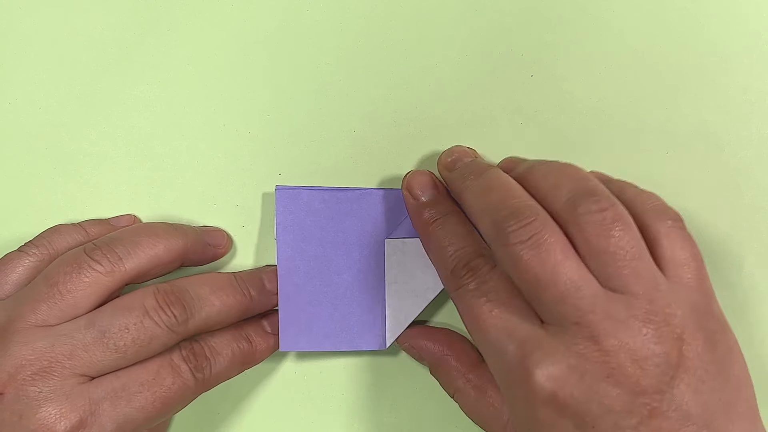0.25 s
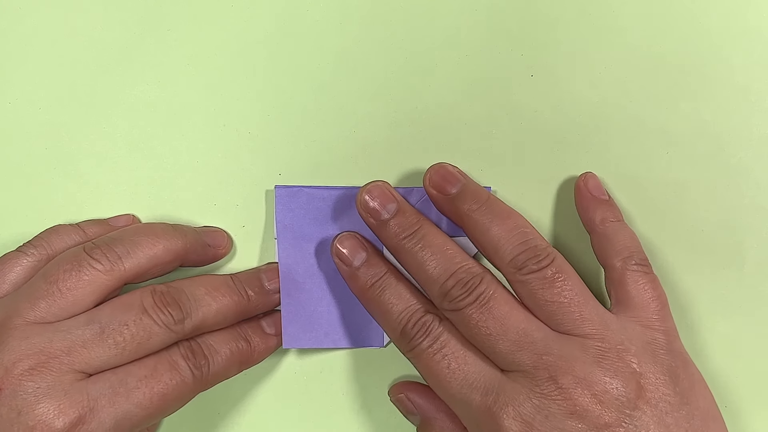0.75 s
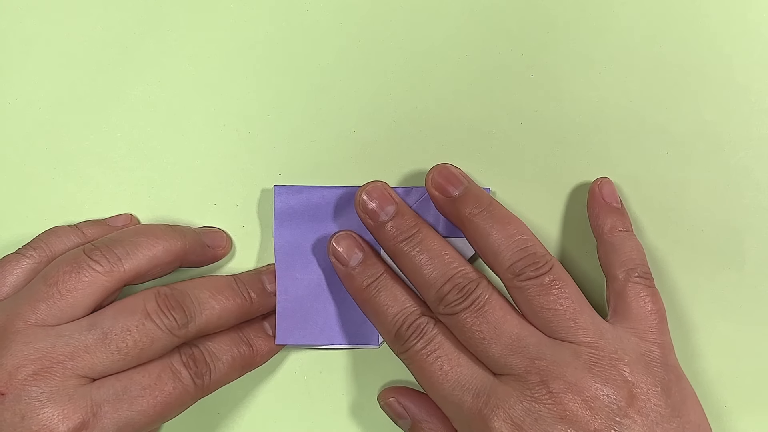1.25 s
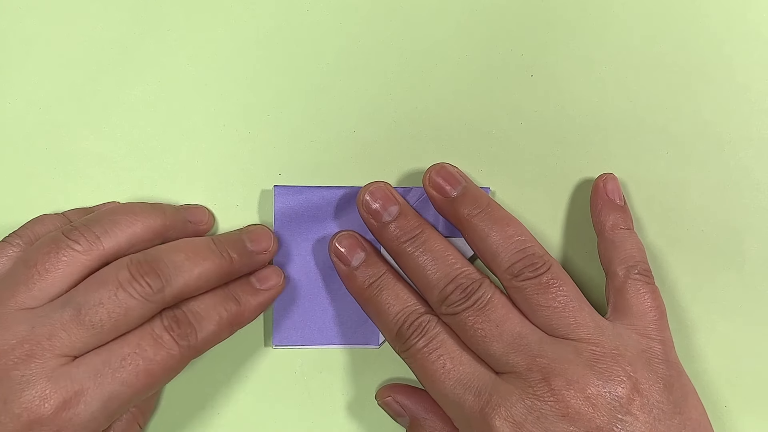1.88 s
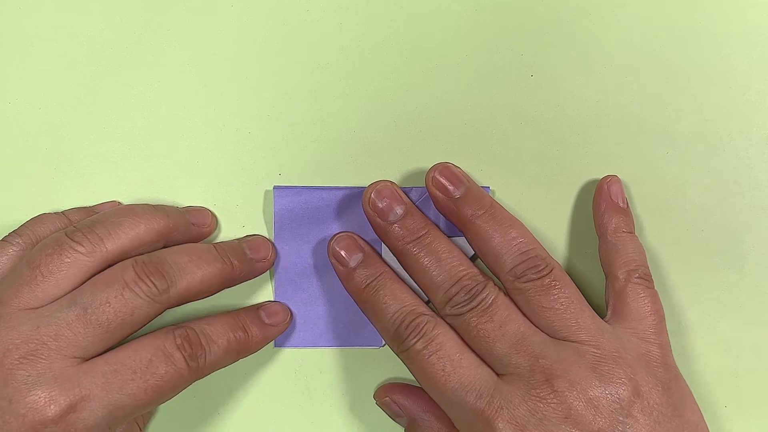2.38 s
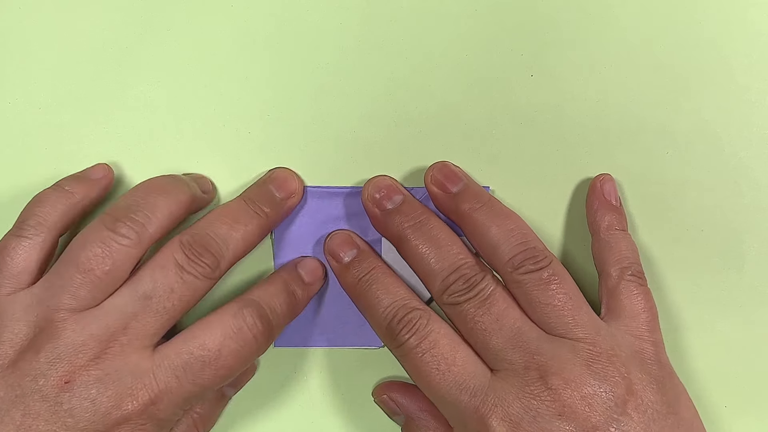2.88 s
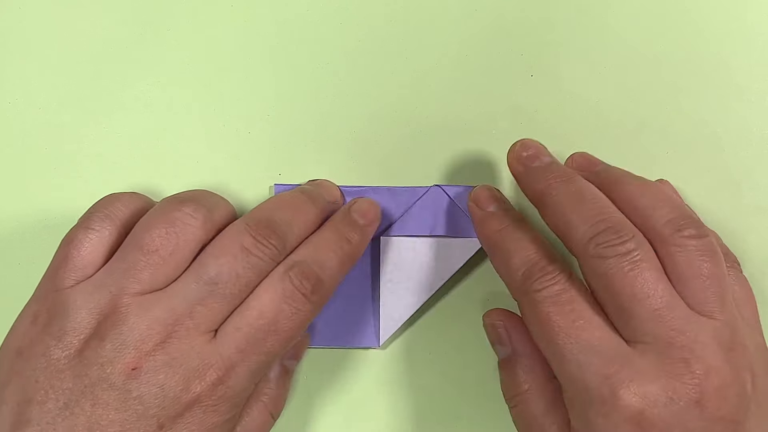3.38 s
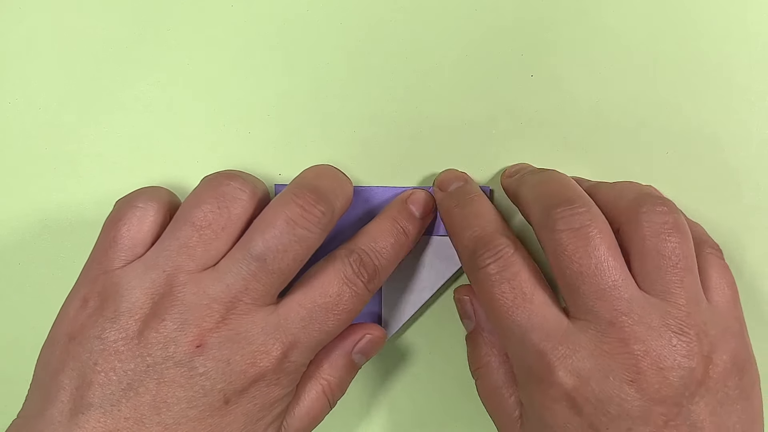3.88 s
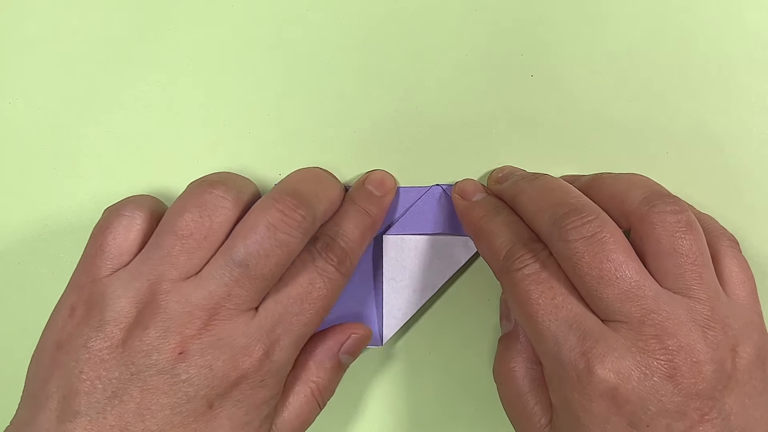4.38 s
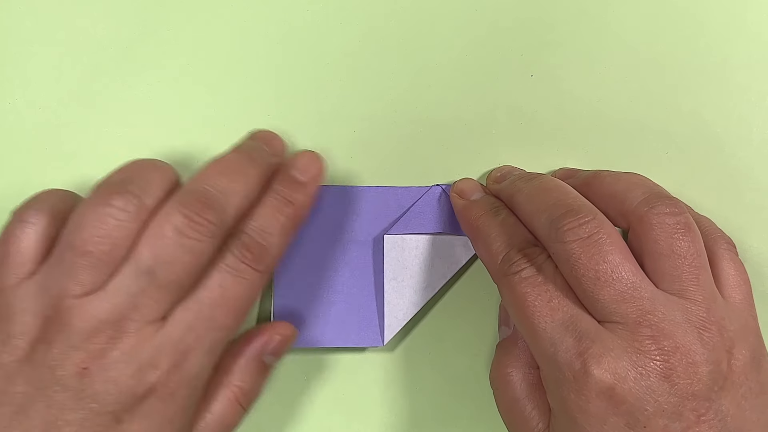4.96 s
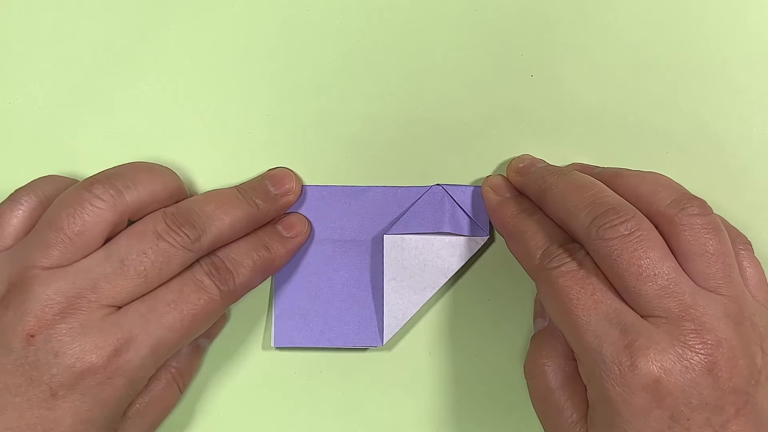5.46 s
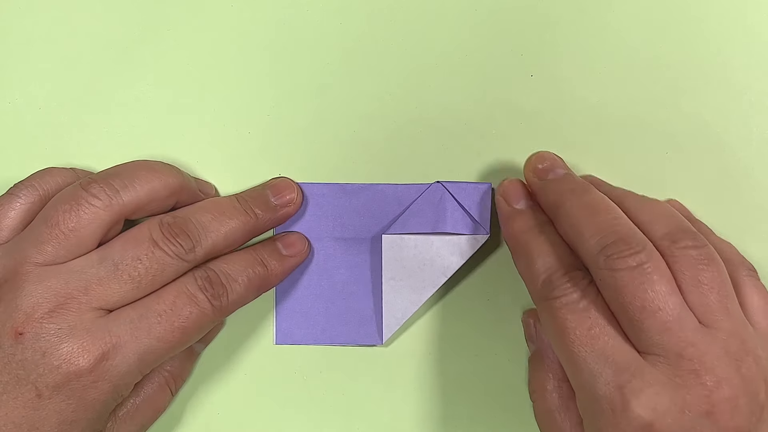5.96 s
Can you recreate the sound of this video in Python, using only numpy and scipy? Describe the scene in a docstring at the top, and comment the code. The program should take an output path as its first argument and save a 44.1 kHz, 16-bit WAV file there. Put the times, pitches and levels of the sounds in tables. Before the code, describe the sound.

A close microphone catches hands folding a small piece of paper on a table in a quiet room with a very short reverberation. From 0 to 0.9 seconds, fingers brush the sheet in short, grainy, hissy strokes, with small ticks near 0.4 and 0.7. Two bright, dry snaps follow at about 1.15, then only faint rubs and a click near 1.6. It is almost still around 2 to 2.4. Rubbing returns at 2.45, and a cluster of crisp crease snaps with a soft thud comes at 3.0 to 3.2. Light fingertip knocks begin around 3.4, growing firmer at 3.9 and 4.4 amid quick, fizzy strokes and a sharp snap at 4.3. A pair of the strongest dull taps lands near 5.2, with a low thud, then airy rustling continues to about 6.2. A faint, low appliance hum, weakest near 2.4, and soft air noise run underneath.

```python
"""At a table in a quiet room, hands fold a small sheet of paper close to one microphone.
Skin slides over the sheet as grainy, shaped noise; creases and flaps snap as short, ringing noise bursts.
Fingertips knock as dull bursts through the table's resonances, and presses thud as a fading low sine.
An appliance hums faintly behind it as slowly drifting sines, over soft air noise."""
import sys
import numpy as np
from scipy import signal
from scipy.fft import rfft, irfft
from scipy.io import wavfile
from scipy.ndimage import uniform_filter1d

SR = 44100
rng = np.random.default_rng(int(sys.argv[2]) if len(sys.argv) > 2 else 0)


def store_pcm(level_fs):
    """Save levels as 16-bit WAV."""
    pcm = np.round(np.clip(level_fs, -1, 1) * 32767).astype(np.int16)
    wavfile.write(sys.argv[1], SR, np.atleast_2d(pcm).T)


N = 274302

# Finger strokes over the paper. Each row: start in seconds, length in seconds, share of the length at which
# it is fastest, relative hiss level in dB, low body in dB, added fizz in dB, fizz centre in Hz.
FINGER_STROKES = [(-.01, 0.11, 0.55, -59.5, 5, 1.5, 11000), (0.134, 0.19, 0.21, -57, 1.5, -2.5, 12000),
                  (.27, .11, 0.17, -57, -2.5, 2.5, 8500), (0.369, 0.31, 0.25, -53, -2.5, 0, 12500),
                  (0.612, 0.19, 0.38, -59.5, -8, -5.5, 11000), (.85, .16, .2, -63.5, -11, -2, 11000),
                  (1.283, 0.1, .3, -67, -12, -5, 11000), (1.504, 0.18, 0.74, -60.5, 1, 4.5, 10000),
                  (1.693, .19, 0.66, -66, -6, -12, 11000), (2.453, 0.18, 0.39, -59, 0.5, -1.5, 11000),
                  (2.561, .15, 0.37, -56, -2, 4.5, 12500), (2.675, 0.13, 0.42, -60, -4.5, 4, 11500),
                  (2.904, 0.06, .45, -61, -2, 3, 10000), (3.018, 0.095, 0.62, -60.5, 2, 5, 9500),
                  (3.108, 0.38, 0.58, -62.5, 2, 2.5, 9500), (3.488, 0.42, 0.15, -63, 1.5, -1.5, 11000),
                  (3.69, 0.092, 0.48, -59.5, -1.5, 2.5, 9000), (3.767, 0.093, .55, -59, 0, 1, 8500),
                  (3.873, 0.21, 0.57, -60, 1, 7, 10900), (3.92, 0.073, 0.84, -55, 6, 8, 10800),
                  (4.12, 0.16, 0.59, -63.5, 4, 3, 9000), (4.276, 0.098, 0.38, -51.5, 1, 1, 12000),
                  (4.423, 0.22, 0.54, -57.5, 4, 6.5, 10900), (4.572, .14, 0.9, -60, 8, 8.5, 12100),
                  (4.707, .105, 0.68, -64, 1, 9, 13300), (4.945, 0.059, 0.92, -61, -3, 3.5, 9500),
                  (5.033, 0.16, 0.4, -60, 5.5, 7, 10800), (5.215, 0.054, 0.57, -56, 1.5, 9, 9400),
                  (5.259, 0.3, 0.26, -58, -9, 1, 10500), (5.385, 0.22, 0.37, -61.5, -0.5, -3.5, 10800),
                  (5.589, 0.15, .45, -65.5, 7, 3, 11000), (5.678, 0.28, 0.62, -63, 5, -11, 10700),
                  (5.847, 0.2, 0.71, -56, -2, 2.5, 13700), (6.03, 0.33, 0.8, -70, 9, 1, 11000)]
# Colour of skin sliding on paper. Each row: pitch in Hz, level in dB.
RUB_COLOUR = [(100, 8), (350, 9), (900, 8), (2100, 7), (2800, 6.5), (4200, 9), (5300, 3), (7400, 7.5),
              (8600, 7.5), (10200, 7.5), (11700, 3), (12800, -0.5), (14200, -4.5), (16000, -18)]
# How much of the low body each pitch takes. Each row: pitch in Hz, share from 0 to 1.
BODY_SHARE = [(2200, 1), (3500, 0)]
# Paper snaps. Each row: time in seconds, relative level in dB, body in dB, brightness in dB, flap pitch in Hz,
# flap ring in dB, time for the burst to fall by 60 dB in seconds, lead-in scrape in dB.
PAPER_SNAPS = [(0.049, -20.5, 3, 4, 3940, 8, 0.015, 6), (0.0753, -17, 7, -12, 2230, 12, .028, -24),
               (0.2977, -22, 8, 7.5, 3110, 17, 0.011, -30), (0.3858, -1, -10, -37, 2070, 17.5, 0.007, -28),
               (.4, -13.5, 6, -20, 2150, 10, 0.035, -12), (.6722, -8, -9, -16.5, 3220, 7, 0.008, -26),
               (0.6869, -19.5, 4.5, -20, 1115, 18, 0.019, -30), (1.128, 3, -7, -2, 5800, 10.5, 0.0078, -39),
               (1.1632, 8.5, -12.5, -6, 6100, 16.5, 0.013, -32),
               (1.1678, 1, -11.5, -21, 2550, 7, 0.011, -31), (1.6285, -9.5, -6, -6.5, 6500, 10.5, 0.02, -1),
               (2.9693, -3.5, -2.5, -19, 2820, -3, 0.0043, -48),
               (3.0312, -13.5, 2.5, -5, 2150, 16, 0.021, -28), (3.1321, 3, 0, -4.5, 3300, 11.5, 0.011, -14),
               (3.1666, -13.5, -12, 4, 2930, 10, 0.009, -18),
               (3.17, 8.5, -13.5, -8, 2020, 14.5, 0.0072, -38), (3.1867, 0, 2, -4, 3500, 15.5, 0.0057, -16),
               (3.2083, 2, -21, -22, 2290, 11, 0.0026, -32), (3.8327, -18.5, 9, -22, 2200, 14, 0.0074, -36),
               (4.0514, -23.5, 6, -18, 2170, 12, 0.0091, -30), (4.205, -13, -2.5, -13, 2270, 5, 0.022, -26),
               (4.2412, -11.5, 2, -26, 1630, 6, .016, -34), (4.3135, 4, -1, -8, 3280, 10.5, 0.0052, -21),
               (4.6907, -13, 4.5, 1.5, 1520, 16, 0.024, -1), (4.9945, -16, 7.5, -3, 1270, 3, 0.036, -2),
               (5.004, -14, -8, -14, 2920, 11, 0.0054, -30), (5.0244, -5.5, -2, -12, 2160, 8.5, .012, -36),
               (5.348, -6, -3.5, -10, 3060, 11, 0.0051, -29),
               (5.375, -17.5, -2, -21, 1495, 26.5, 0.0088, -30), (5.6365, -21, 2, -9, 1100, 4, 0.011, -37),
               (6.0729, -25, 8.5, -11, 1230, 2, 0.027, -32)]
# Resonances of the folded sheet. Each row: pitch in Hz, width in Hz, boost in dB.
SHEET_MODES = [(2144, 180, 5.5), (2835, 210, 6.5), (3260, 330, 3), (4360, 130, 8), (6740, 710, 3.7),
               (10100, 860, 2)]
# Soft presses that make the whole table thud. Each row: time in seconds, level in dB.
TABLE_THUDS = [(0.053, -50), (3.042, -37), (3.977, -48), (4.413, -50), (4.996, -46), (5.198, -41.5)]
# Fingertips landing. Each row: time in seconds, relative level in dB, then three parts in dB on top of it:
# the pad's low weight, the knock, the nail's tick.
FINGER_TAPS = [(.1406, -22, 13, 14.5, 0), (0.2976, -10, -8, -2, -19), (.412, -19, 12, 10, -13),
               (.673, -12.5, -14, -6, 0), (3.042, -19, 15, 18, 1), (3.426, -21.5, -5, 12, -9),
               (3.5744, -20.5, -1, 8, -19), (3.6461, -8.5, -12, 13.5, -21), (3.871, -16, 10.5, 9, -3),
               (3.9321, -0.5, -3.5, 4, -8), (3.9645, -5.5, -3, 5, -18), (3.985, -13.5, 7, 3, -9),
               (4.412, -11.5, 10, 1, -7), (4.4335, -0.5, -4, 10, -7.5), (5.082, -10, 8.5, 9, -20),
               (5.1578, 2, 0, 6, -11.5), (5.1948, 6, 0, 2.5, -12.5), (5.22, -22, 1, 2, -9),
               (5.263, -11, 20, 8, -8), (5.2991, -16, 5, 4, -10), (5.619, -18.5, -23, 21, -15)]
# Resonances of the table top. Each row: pitch in Hz, width in Hz, boost in dB.
TABLE_MODES = [(186.4, 30, 10.5), (305, 11, 6), (390.5, 27, 6.5), (462, 37, 5), (672, 30, 7.5),
               (725, 82, 6), (940, 97, 15.5), (1210, 55, 6), (1355, 123, 8.5)]
# Loudness of the motor hum over time. Each row: time in seconds, rms level in dB.
HUM_LEVEL = [(0, -62), (.7, -63), (1.4, -63.5), (2, -66.5), (2.4, -74.5), (3, -67.5), (3.6, -70),
             (4.1, -61), (4.8, -62.5), (5.5, -60), (6.22, -61)]
# Steady tones of the appliance. Each row: pitch in Hz, rms level in dB.
APPLIANCE_TONES = [(100, -103), (317.6, -76.5), (444, -71.5), (500.6, -79.5), (527, -76.5), (888.2, -81.5),
                   (1332, -80)]
# Colour of room air and microphone hiss. Each row: pitch in Hz, level in dB.
AIR_COLOUR = [(25, -47), (45, -59.5), (80, -41), (130, -46.5), (250, -50), (340, -48), (600, -52),
              (1000, -53.5), (1550, -60.5), (2050, -53.5), (2700, -62.5), (5500, -64.5), (10000, -69),
              (15000, -69)]
# Reverberation. Each row: pitch in Hz, time to fall by 60 dB in seconds.
ROOM_T60 = [(150, 0.44), (600, 0.17), (2000, 0.16), (6000, 0.17), (14000, 0.13)]
# How strongly the room returns each pitch. Each row: pitch in Hz, level in dB.
ROOM_COLOUR_DB = [(200, 0.5), (1000, 1.5), (2300, -4.5), (4200, -1.5), (6200, 1), (8500, 0), (15000, 7.5)]

BUFFER = 4096  # samples in one burst or filter
BINS = np.fft.rfftfreq(BUFFER, 1 / SR)
CLOCK = np.arange(N) / SR
HUM_HZ = 91.4  # average pitch
TOUCH_S, LIFT_S = 0.0078, 0.016  # skin meets and leaves the sheet
SLOW_START_DB, SLOW_END_DB = -6.5, -10.5  # a stroke is weaker at its ends than at its fastest
ARCH = 0.99  # shape of that fall
RESTING_DB = -73.5  # relative hiss of fingers that only hold the sheet
FIZZ_OCTAVES = 0.65  # half width of the fizz band
FIZZ_WITH_SPEED = 0.49  # the fizz swells and fades this much more steeply than the rest
THUD_HZ, THUD_T60 = 94.4, 0.24  # the table's lowest mode and its ring time in seconds
NAIL_FALL_DB = -10  # the nail's tick falls from 2000 to 5500 Hz
EDGE_HZ = 15850  # top of the recorder's band


def gain_of(db):
    """Turns decibels into amplitude."""
    return 10 ** (np.asarray(db) / 20)


def evened(x):
    """Scales to an rms of one."""
    return x / np.sqrt(np.mean(x ** 2) + 1e-20)


def read(points, hz):
    """Joins (Hz, value) points by straight lines on a log-frequency axis."""
    f, value = np.transpose(points)
    return np.interp(np.log(hz + 1), np.log(f + 1), value)


def add(mix, s, sound):
    """Lays a sound into the mix at time s."""
    part = mix[max(round(s * SR), 0):][:len(sound)]
    part += sound[:len(part)]


def wander(rate_hz):
    """Smooth random drift of unit rms, with little movement faster than the given rate."""
    hz = np.fft.rfftfreq(N, 1 / SR)
    return evened(irfft(rfft(rng.standard_normal(N)) * np.exp(-(hz / rate_hz) ** 2), N))


def peak(hz, width_hz, db):
    """A resonance as a bump in dB on a flat response."""
    return 10 * np.log10(1 + (gain_of(db) ** 2 - 1) / (1 + (2 * (BINS - hz) / width_hz) ** 2))


def coloured(x, db):
    """Filters with the given response so that sound only follows its cause: sharp start, ringing end."""
    log_gain = np.log(gain_of(np.r_[db, db[-2:0:-1]]))  # mirrored to cover negative frequencies
    response = np.exp(np.conj(signal.hilbert(log_gain)))
    return signal.fftconvolve(x, np.fft.ifft(response).real)


def blow(t60, click, lead_db, lead_s):
    """A spectrally even jolt in mid-buffer: a swelling scrape, the release, then dying flutter."""
    middle = BUFFER // 2
    t = (np.arange(BUFFER) - middle) / SR
    scrape = gain_of(lead_db) * np.exp(-abs(t) / lead_s)
    flutter = np.exp(-np.log(1000) * abs(t) / t60)
    jolt = np.where(t < 0, scrape, flutter) * rng.standard_normal(BUFFER)
    jolt /= np.linalg.norm(jolt)
    jolt[middle] += click
    # undo the burst's own broad colour
    power = uniform_filter1d(abs(rfft(jolt)) ** 2, size=60)
    return coloured(jolt, -10 * np.log10(power))


def background():
    """A motor hum and steady tones drift slightly in phase, over still room air."""
    drift = 0.033 * wander(rate_hz=10.0)  # in cycles
    hum_gain = gain_of(np.interp(CLOCK, *np.transpose(HUM_LEVEL)))
    hum = hum_gain * np.sin(2 * np.pi * (HUM_HZ * CLOCK + drift))
    tones = np.zeros(N)
    for hz, db in APPLIANCE_TONES:
        cycles = hz * CLOCK + 0.15 * wander(rate_hz=1.8)
        tones += gain_of(db) * np.sin(2 * np.pi * cycles)
    air_gain = gain_of(read(AIR_COLOUR, np.fft.rfftfreq(N, 1 / SR)))
    air = irfft(rfft(rng.standard_normal(N)) * air_gain, N)
    return np.sqrt(2) * (hum + tones) + air  # a sine's peak is root two times its rms


def stroke(t, start, length, crest):
    """Gain of one stroke: the finger touches, speeds up, slows down and lifts."""
    u = np.clip((t - start) / length, 0, 1)
    speeding_db = SLOW_START_DB * abs(1 - u / crest) ** ARCH
    slowing_db = SLOW_END_DB * abs((u - crest) / (1 - crest)) ** ARCH
    slow_db = np.where(u < crest, speeding_db, slowing_db)
    contact = np.minimum((t - start) / TOUCH_S, (start + length - t) / LIFT_S)
    return gain_of(slow_db) * np.clip(contact, 0, 1)


def rubbing():
    """Skin catches on paper fibres: a grainy hiss whose low body and high fizz vary from stroke to stroke."""
    catches_db = 2.8 * wander(rate_hz=1500)
    grit = rng.standard_normal(N) * gain_of(catches_db + 0.9 * wander(rate_hz=50))
    hz, t, spectrum = signal.stft(evened(grit), SR, nperseg=512, noverlap=384)
    power = gain_of(RESTING_DB) ** 2
    for start, length, crest, hiss, body, fizz, fizz_hz in FINGER_STROKES:
        band = np.exp(-(np.log2((hz + 1) / fizz_hz) / FIZZ_OCTAVES) ** 4)
        swell = stroke(t, start, length, crest) ** (1 + FIZZ_WITH_SPEED * band[:, None])
        level_db = hiss + body * read(BODY_SHARE, hz) + fizz * band
        power = power + (gain_of(level_db)[:, None] * swell) ** 2
    # the moving hand shifts the colour in patches of pitch and time
    patch_shape = np.outer(np.hanning(9), np.hanning(41))
    patches = evened(signal.fftconvolve(rng.standard_normal(spectrum.shape), patch_shape, "same"))
    colour = read(RUB_COLOUR, hz)[:, None] + 2.0 * patches
    shaped = spectrum * np.sqrt(power) * gain_of(colour)
    return signal.istft(shaped, SR, nperseg=512, noverlap=384)[1][:N]


def snapping():
    """An edge slips off a finger or a crease buckles, and the free flap rings for a few cycles."""
    out = np.zeros(N)
    sheet = sum(peak(*mode) for mode in SHEET_MODES)
    for s, db, body, bright, flap_hz, ring_db, t60, lead_db in PAPER_SNAPS:
        colour = read([(60, body - 20), (450, body - 3.5), (1100, body + 0.76), (2400, -2.4),
                       (5500, bright - 1.5), (10000, bright - 4), (12500, bright - 17.5),
                       (15500, bright - 30)], BINS)
        # the louder the ring, the lower the response around it, most of all near the flap pitch
        taken = 0.5 * ring_db * read([(500, .5), (flap_hz, 1), (12000, .1)], BINS)
        ring = peak(flap_hz, 0.085 * flap_hz, ring_db) - taken
        jolt = blow(t60, click=0.12, lead_db=lead_db, lead_s=0.003)
        add(out, s - BUFFER / 2 / SR, coloured(jolt, db + colour + ring + sheet))
    return out


def thudding():
    """The weight of a hand sets off the table's lowest mode, a sine that dies away."""
    out = np.zeros(N)
    t = np.arange(SR // 2) / SR
    fade = np.exp(-np.log(1000) * t / THUD_T60)
    onset = 1 - np.exp(-t / 0.0015)
    thud = fade * onset * np.sin(2 * np.pi * THUD_HZ * t)
    for s, db in TABLE_THUDS:
        add(out, s, gain_of(db) * thud)
    return out


def tapping():
    """Padded fingertips land on the sheet: short, dull blows."""
    out = np.zeros(N)
    for s, db, weight, knock, tick in FINGER_TAPS:
        bright = tick + NAIL_FALL_DB
        colour = read([(40, weight - 16), (170, weight - 3), (400, knock - 3), (850, -6.0), (1250, -9.5),
                       (2000, tick), (5500, bright), (11000, bright - 3), (16000, bright - 17)], BINS)
        jolt = blow(t60=0.03, click=0.88, lead_db=-43, lead_s=.002)
        add(out, s - BUFFER / 2 / SR, coloured(jolt, db + colour))
    return out


def table_top(taps, snaps):
    """The table rings under the fingertips and shudders faintly after each snap of the sheet."""
    t = np.arange(BUFFER) / SR
    shudder = rng.standard_normal(BUFFER) * np.exp(-t / 0.002)
    shaken = signal.fftconvolve(snaps, shudder / np.linalg.norm(shudder))
    # mostly the low pitches pass from paper to table
    felt = coloured(shaken, read([(100, -0.5), (400, -6.5), (1200, -15.5), (3000, -39)], BINS))
    return coloured(taps + felt[:N], sum(peak(*mode) for mode in TABLE_MODES))[:N]


def room(x, tail_db, echo_db, echo_s):
    """One near surface throws back a smeared echo; the walls add a short tail."""
    hz, t, spectrum = signal.stft(rng.standard_normal(SR // 2), SR, nperseg=256)
    fade = np.exp(-np.log(1000) * t / read(ROOM_T60, hz)[:, None])
    tail = signal.istft(spectrum * fade, SR, nperseg=256)[1]
    tail *= 1 - np.exp(-np.arange(len(tail)) / SR / 0.015)  # reflections build up gradually
    response = gain_of(tail_db) * tail / np.linalg.norm(tail)
    echo = rng.standard_normal(size=90) * np.hanning(90)
    add(response, echo_s, gain_of(echo_db) * echo / np.linalg.norm(echo))
    return x + signal.fftconvolve(x, coloured(response, read(ROOM_COLOUR_DB, BINS)))[:N]


def scene():
    """Mixes paper and table in the room with the thuds and the background."""
    snaps = gain_of(-0.04) * snapping()
    paper = gain_of(-0.7) * rubbing() + snaps
    table = table_top(gain_of(-4.0) * tapping(), snaps)
    paper_in_room = room(paper, tail_db=-13.0, echo_db=-20.0, echo_s=0.014)
    table_in_room = room(table, tail_db=-12, echo_db=-11.5, echo_s=.0125)
    return (paper_in_room + table_in_room + thudding() + background())[None]


def record(dry):
    """The microphone cuts the lowest pitches and the recorder limits the highest."""
    low_cut = signal.butter(3, 42, "highpass", fs=SR, output="sos")
    band_limit = signal.firwin(511, EDGE_HZ, window=("kaiser", 9), fs=SR)
    return signal.oaconvolve(signal.sosfilt(low_cut, dry), band_limit[None], "same")


dry = scene()
out = record(dry)
store_pcm(out)
```